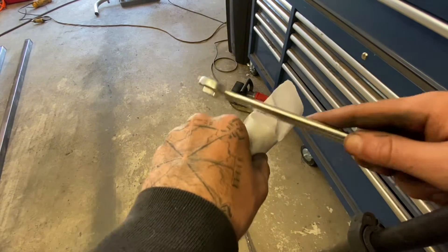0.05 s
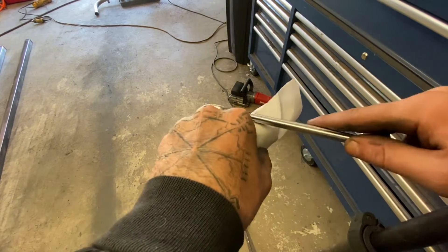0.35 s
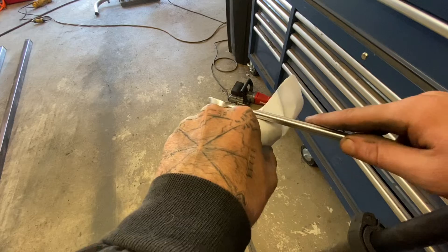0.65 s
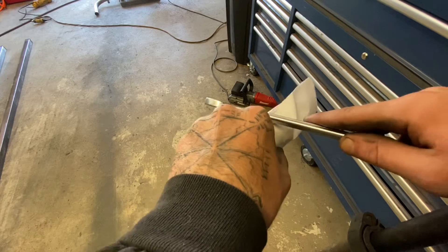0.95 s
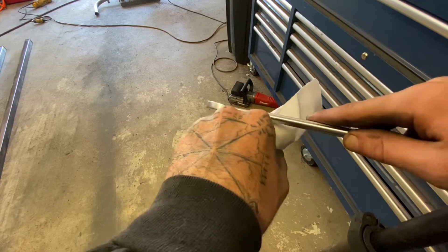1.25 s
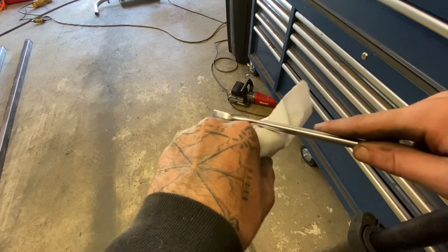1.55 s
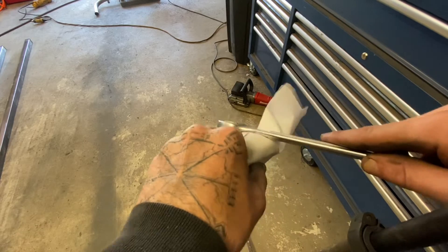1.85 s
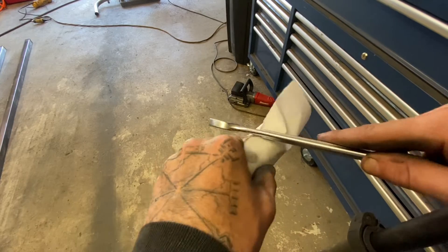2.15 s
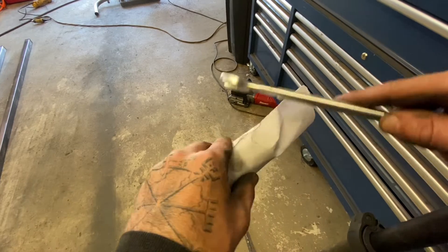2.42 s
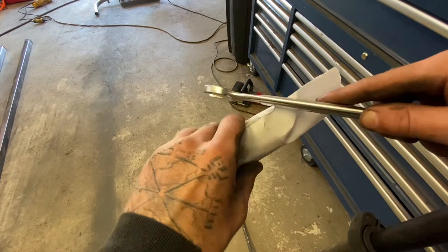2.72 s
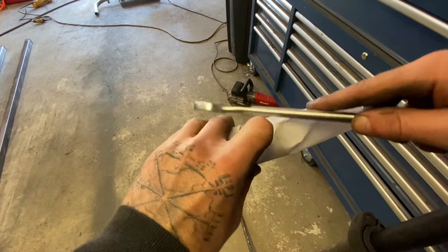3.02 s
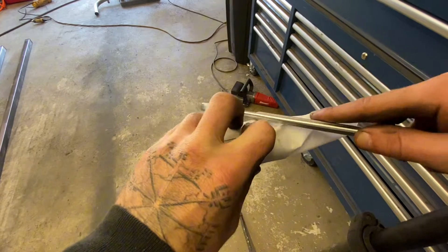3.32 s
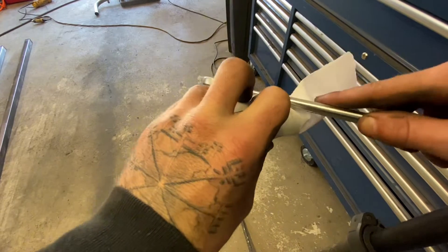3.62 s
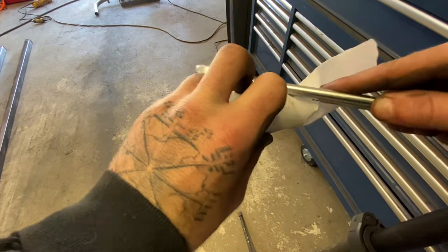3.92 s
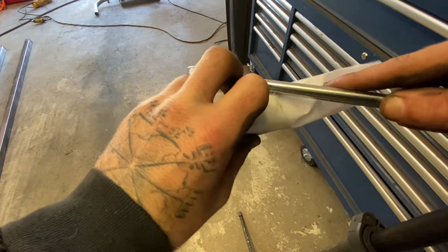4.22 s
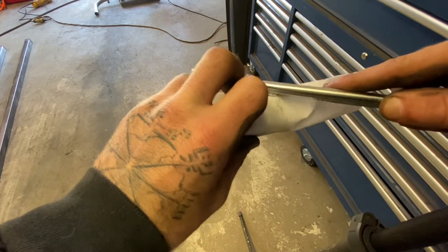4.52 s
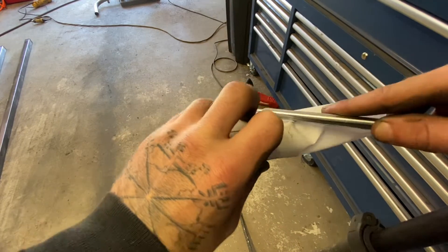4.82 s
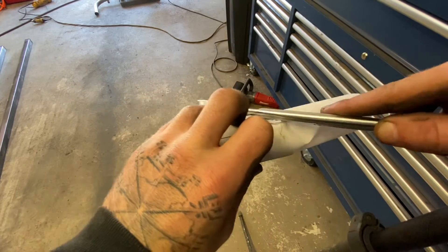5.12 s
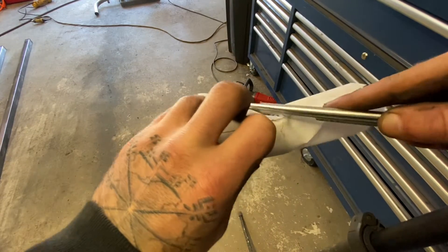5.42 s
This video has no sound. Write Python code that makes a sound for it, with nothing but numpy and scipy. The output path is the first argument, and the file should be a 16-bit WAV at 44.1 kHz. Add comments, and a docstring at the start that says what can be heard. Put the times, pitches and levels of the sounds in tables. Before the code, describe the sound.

A steel wrench is rubbed hard over paper wrapped around a hand-held metal tube, heard up close. It starts faintly, and from about 0.5 seconds quick, uneven strokes make a dry, buzzing rasp, with a fine papery hiss above and a dull rumble from the tube below. Creases pop and the wrench gives short knocks, the strongest at about 2.3 seconds. From 2.5 to 3.2 seconds it is almost quiet, with one small scuff as the hand changes grip. The rubbing then resumes with a slightly different tone and a few lighter knocks. Loud crease pops come at about 3.5, 3.7 and 4.3 seconds, while the strokes run closely together. From around 4.9 seconds they become lighter and thinner, easing off by 5.6 seconds. Behind it all is the very faint, low air noise of a quiet workshop with little echo.

```python
"""First comes a dry, buzzing rasp: a steel wrench is rubbed hard, stroke after stroke, over paper
wrapped round a metal tube. The wrench sticks and slips, so the paper buzzes, its fibres rasp and hiss,
and the hand-held tube rumbles dully. Creases pop, and the wrench knocks on the tube.
Half way through, the hand takes a new grip and the tone changes. Behind it all is a quiet workshop."""
import sys
import numpy as np
from scipy import signal
from scipy.fft import rfft, irfft
from scipy.io import wavfile
from scipy.ndimage import uniform_filter1d

SR = 44100
rng = np.random.default_rng(int(sys.argv[2]) if len(sys.argv) > 2 else 0)


def wav_out(sig):
    """Save sig, one row per channel (or a flat mono array), as 16-bit PCM at SR to the path in sys.argv[1]."""
    wavfile.write(sys.argv[1], SR, np.round(np.clip(np.atleast_2d(sig).T, -1, 1) * 32767).astype(np.int16))


N = 250047
TIME = np.arange(N) / SR
REGRIP_S = 2.9   # when the hand takes its new grip


def from_db(db):
    """Turn decibels into a number to multiply by."""
    return 10 ** (np.asarray(db) / 20)


def rms_one(x):
    """Scale a sound so that its average level (rms) is 1."""
    return x / np.sqrt(np.mean(x ** 2) + 1e-20)


def evened(x):
    """Hold the level at 1 over about 30 ms; the finer grain stays."""
    return x / np.sqrt(np.abs(uniform_filter1d(x ** 2, size=1300)) + 1e-12)


def band(x, low_hz, high_hz):
    """Keep what lies between two frequencies."""
    return signal.sosfilt(signal.butter(2, [low_hz, high_hz], "band", fs=SR, output="sos"), x + 1e-18)


def coloured(x, colour, size=4096):
    """Filter a sound with a tone colour: a table of frequencies and their levels."""
    hz, db = np.transpose(colour)
    grid = np.maximum(np.arange(size // 2 + 1) * SR / size, 1)
    octaves_outside = np.abs(np.log2(grid / np.clip(grid, hz[0], hz[-1])))
    level = np.interp(np.log(grid), np.log(hz), db) - 24 * octaves_outside.clip(0, 2)
    # build a pulse of that colour which starts at once (minimum phase)
    cepstrum = irfft(np.log(from_db(level)))
    cepstrum[1:size // 2] *= 2
    cepstrum[size // 2 + 1:] = 0
    pulse = irfft(np.exp(rfft(cepstrum)))
    return signal.oaconvolve(x, pulse / np.abs(pulse).max())[:len(x)]


def resonance(x, hz, width_hz):
    """Ring at one pitch; a narrower width rings longer."""
    r = np.exp(-np.pi * width_hz / SR)
    feedback = [1, -2 * r * np.cos(2 * np.pi * hz / SR), r * r]
    return signal.lfilter(np.array([1, 0, -1]) * (1 - r * r) / 2, feedback, x + 1e-18)


def drift(per_s):
    """Wander at random, typically by 1 either way."""
    knots = rng.standard_normal(N // 20)
    return rms_one(np.interp(TIME * per_s, np.arange(len(knots)), knots))


def swell(t, rise_s, order):
    """Rise smoothly to 1 at rise_s and die away; a higher order is shorter."""
    return (t / rise_s * np.exp(1 - t / rise_s)) ** order


def add(out, start_s, sound):
    """Mix a short sound in at its start time."""
    at = int(round(start_s * SR))
    out[at:at + len(sound)] += sound[:N - at]


def lift_band(x, start_s, end_s, hz, width_hz, db, fade_s):
    """Lift one band between two times; negative dB cuts it."""
    held = np.clip(np.minimum(TIME - start_s, end_s - TIME) / fade_s + .5, 0, 1)
    return x + (from_db(db) - 1) * held * resonance(x, hz, width_hz)


def clicks(per_s, spread_db, max_spreads):
    """Clicks of uneven size at random moments."""
    sizes = from_db(spread_db * np.minimum(rng.exponential(1, N), max_spreads))
    return sizes * rng.choice([-1, 1], N) * (rng.random(N) < per_s / SR)


# The tone colour of the workshop air. Each row: frequency in Hz, level in dB.
AIR_COLOUR = [(20, -1), (50, 7.5), (64, -1), (78, -0.5), (125, -13), (180, -12), (235, -3), (320, -16),
              (700, -15.5), (1500, -28.5), (3000, -35.5), (14000, -34)]


def workshop_air():
    """The room's own faint, low, steady noise."""
    return from_db(-71) * rms_one(coloured(rng.standard_normal(N), AIR_COLOUR))


def workshop_echo(x, decay_s, gap_s):
    """Sound bounces off floor and tool chest and comes back a little duller."""
    t = TIME[:SR // 2]
    build_up = 1 - np.exp(-(t / gap_s) ** 2)
    tail = rng.standard_normal(len(t)) * from_db(-60 * t / decay_s) * build_up
    tail /= np.sqrt(np.sum(tail ** 2))
    return band(signal.oaconvolve(x, tail)[:N], 180, 9000)


def squeak(peak_s, swell_s, hz, db):
    """A very faint, thin note swells and fades as the wrench comes down."""
    tone = resonance(rng.standard_normal(N), hz, width_hz=70)
    tone = resonance(tone, hz, width_hz=70)
    return from_db(db) * np.exp(-((TIME - peak_s) / swell_s) ** 2) * evened(tone)


# The hand bumps the tube. Each row: start in seconds, peak level in dB, pitch in Hz.
HAND_BUMPS = [(0.576, -61, 190), (0.989, -53, 193), (2.086, -43.5, 192), (2.276, -43, 194),
              (3.23, -52, 150), (4.074, -55.5, 131), (5.283, -51.5, 234)]


def hand_bumps():
    """Flesh against the tube gives a few soft, low vibrations."""
    out, t = np.zeros(N), TIME[:SR // 6]
    for start_s, db, hz in HAND_BUMPS:
        add(out, start_s, from_db(db) * swell(t, rise_s=0.0049, order=1) * np.sin(2 * np.pi * hz * t))
    return out


# The tone colour of cracking paper, also in pops and knocks. Each row: frequency in Hz, level in dB.
CRACK_COLOUR = [(700, -30), (1400, -5.5), (2050, -1.5), (2600, -3.5), (3100, -1.5), (3600, -4), (4300, -11),
                (5200, -15.5), (6600, -7.5), (7900, -22.5), (9200, -8.5), (10500, -32), (15000, -37.5)]


def crinkles():
    """The paper crackles with lone, tiny cracks."""
    return rms_one(coloured(clicks(per_s=40, spread_db=6.5, max_spreads=3), CRACK_COLOUR))


# Creases that pop. Each row: start in seconds, peak level in dB, pitch in Hz,
# snap in dB compared with that peak (before snap_trim_db is added), swell time in seconds.
CREASE_POPS = [(0.212, -43, 1166, -21.5, 0.0022), (0.468, -24, 1580, -2.5, 0.0011),
               (0.534, -22, 1200, 0, 0.0018), (0.6082, -24.5, 1030, -3, 0.0022),
               (0.6691, -21.5, 1340, -22, 0.00094), (0.693, -27, 1320, -20, 0.0013),
               (0.8081, -21.5, 1400, -1.5, 0.001), (1.1621, -21.5, 1130, -21, 0.0015),
               (1.166, -21, 1210, -2.5, 0.0018), (1.268, -23.5, 1180, -26, 0.001),
               (1.4352, -21.5, 1345, -20, 0.0039), (1.4412, -18.5, 1120, -6, .0013),
               (1.4515, -16.5, 1250, -11, 0.0014), (1.6612, -22, 1140, -8, 0.0012),
               (1.8229, -22, 1213, 2, 0.0014), (2.2649, -16.5, 1227, -13, 0.0011),
               (2.3884, -27.5, 1154, -8, 0.0011), (2.549, -57.5, 1377, 0.5, 0.00087),
               (2.7227, -58, 1260, -11, .0021), (2.937, -36, 1236, -10, 0.0019),
               (2.9483, -39, 1230, -15, .001), (3.448, -25, 1150, -18, .0008),
               (3.4671, -16.5, 1160, -4, 0.001), (3.4727, -12, 1135, -9.5, 0.0018),
               (3.6893, -10.5, 1267, -8, 0.0017), (3.7053, -21.5, 1415, -3, 0.001),
               (4.0297, -17.5, 1244, -2, .0019), (4.3395, -11.5, 1251, -9, 0.0027),
               (4.3474, -23.5, 1320, -10, 0.0022), (4.3776, -26.5, 1220, -5, 0.0024),
               (4.7643, -29.5, 1080, 1, 0.0009), (5.5911, -32.5, 1204, -24, 0.0042)]


def crease_pops(snap_decay_s, snap_trim_db):
    """A crease flips over: a small dull snap, then a few vibrations that swell and die."""
    out, t = np.zeros(N), TIME[:SR // 20]
    for start_s, db, hz, snap_db, rise_s in CREASE_POPS:
        burst = rng.standard_normal(len(t)) * from_db(-60 * t / snap_decay_s)
        snap = band(coloured(burst, CRACK_COLOUR), 900, 5500)
        snap *= from_db(snap_db + snap_trim_db) / np.abs(snap).max()
        flip = swell(t, rise_s, order=3) * np.sin(2 * np.pi * hz * t)
        add(out, start_s, from_db(db) * (flip + snap))
    return out


# The wrench knocks on the wrapped tube. Each row: start in seconds, tube thud in dB,
# paper slap in dB, crack in dB, pitch of the ring in Hz.
WRENCH_KNOCKS = [(0.48, -62, -11.5, -9.5, 3320), (0.5533, -36, -16, -15.5, 6470),
                 (0.8497, -44, -18.5, -16.5, 4100), (0.9118, -48, -18.5, -16, 3120),
                 (1.4455, -32.5, -14.5, -20, 3000), (1.681, -28, -17, -15.5, 2830),
                 (1.9475, -25, -21.5, -14.5, 3520), (2.0506, -33.5, -15.5, -22.5, 3800),
                 (2.284, -22, -7, -11, 4060), (3.2336, -49, -27.5, -20.5, 3380),
                 (3.406, -56, -27, -20, 2760), (3.4732, -43.5, -26, -27, 3300)]


def wrench_knocks(chatter_decay_s, crush_decay_s):
    """A hard hit chatters and crushes the paper, shaking tube, sleeve and fibres together."""
    out, t = np.zeros(N), TIME[:SR // 8]
    for start_s, thud_db, slap_db, crack_db, ring_hz in WRENCH_KNOCKS:
        chatter = from_db(-12.5 - 60 * t / chatter_decay_s)
        crush = from_db(-24 - 60 * t / crush_decay_s)
        force = rng.standard_normal(len(t)) * (chatter + crush)
        force[0] = 1   # the hit itself
        thud = coloured(force, TUBE_COLOUR)
        slap = band(force, 1100, 1944)
        crack = coloured(force, CRACK_COLOUR)
        # each struck spot has a short ring of its own
        crack += from_db(8.5) * resonance(crack, ring_hz, width_hz=700)
        for db, sound in (thud_db, thud), (slap_db, slap), (crack_db, crack):
            add(out, start_s, -from_db(db) * sound / np.abs(sound).max())
    return out


def flexing(x, low_hz, high_hz, count, width_ratio, depth):
    """Small patches of paper tighten and slacken, so their resonances come and go."""
    pitches = np.geomspace(low_hz, high_hz, count)
    return x + sum(depth * drift(per_s=20) * resonance(x, hz, width_ratio * hz) for hz in pitches)


# The tone colour of the hiss. Each row: frequency in Hz, level in dB.
HISS_COLOUR = [(4000, -35.5), (7000, 5.5), (8000, -4), (9200, 4), (10200, -3), (12000, -3.5), (14000, -4),
               (15500, -11)]


def fibre_hiss(force):
    """Fine slips brush a high hiss out of the paper's fibres."""
    hiss = coloured(force, HISS_COLOUR)
    return evened(flexing(hiss, 7000, 18000, count=10, width_ratio=0.044, depth=0.9))


# The tone colour of the hand-held tube. Each row: frequency in Hz, level in dB.
TUBE_COLOUR = [(60, -42), (130, -24), (200, -9), (280, -10), (380, 2), (500, 2.5), (590, 4), (730, -4),
               (860, -0.5), (1100, -16.5), (2000, -53)]
# What the new grip does to the tube. Each row: pitch in Hz, width in Hz, change in dB.
TUBE_GRIP_CHANGES = [(380, 190, -6), (759, 57, 8.5)]


def tube_rumble(force):
    """The slips shake the tube; the new grip damps its low ring and frees a higher one."""
    rumble = coloured(force, TUBE_COLOUR)
    for hz, width_hz, db in TUBE_GRIP_CHANGES:
        rumble = lift_band(rumble, REGRIP_S, np.inf, hz, width_hz, db, fade_s=0.03)
    return evened(flexing(rumble, 170, 850, count=8, width_ratio=0.44, depth=0.41))


# The tone colour of the rasp, one table for each grip. Each row: frequency in Hz, level in dB.
FIRST_GRIP_COLOUR = [(900, -16.5), (1500, -2), (1800, 3), (2050, 7), (2500, -3.5), (3100, 1.5),
                     (3600, -4.5), (4300, -6.5), (5100, -9), (5900, -6.5), (6750, -10.5), (7900, -21.5),
                     (9100, -21), (10500, -41.5)]
SECOND_GRIP_COLOUR = [(900, -16), (1500, -4), (1900, -1), (2400, 7), (2750, 0), (3400, 1), (4200, -2.5),
                      (5100, -2.5), (5900, -4.5), (6750, -6), (7900, -23.5), (9200, -15.5), (10500, -43.5)]
# Patches of paper pinned under the wrench, which ring or are damped.
# Each row: start in seconds, end in seconds, pitch in Hz, change in dB.
PINNED_PATCHES = [(0.46, 0.522, 2200, 2), (1.038, 1.126, 2340, 7), (1.35, 2.477, 4100, 8),
                  (1.76, 2.266, 6000, 3.5), (2.277, 2.416, 6900, 11.5), (3.203, 3.375, 3430, 10),
                  (3.29, 3.396, 2500, -18), (3.612, 3.85, 2870, 9), (3.897, 4.87, 2240, 2),
                  (4.42, 4.68, 4870, 5), (4.874, 5.314, 4040, 8.5), (5.51, 5.7, 3230, 8.5)]


def fibre_rasp(force):
    """The slips scrape the fibres; each grip holds the paper in its own way and colours the rasp."""
    rasp = np.where(TIME < REGRIP_S,
                    coloured(force, FIRST_GRIP_COLOUR), coloured(force, SECOND_GRIP_COLOUR))
    for start_s, end_s, hz, db in PINNED_PATCHES:
        rasp = lift_band(rasp, start_s, end_s, hz, width_hz=480, db=db, fade_s=0.032)
    # the last, lighter strokes lose the middle of the rasp
    rasp = lift_band(rasp, start_s=4.86, end_s=np.inf, hz=2350, width_hz=1070, db=-10, fade_s=0.032)
    return evened(flexing(rasp, 1600, 9000, count=22, width_ratio=0.021, depth=1.0))


# The resonances of the paper sleeve. Each row: pitch in Hz, width in Hz, level in dB.
SLEEVE_RESONANCES = [(1001, 145, -1.5), (1168, 111, 4), (1356, 80, 3.5), (1724, 200, -7.5)]


def paper_buzz(force, wander_db):
    """Coarse slips make the sleeve ring briefly at a few pitches, whose shares shift as it bends."""
    buzz = np.zeros(N)
    for k, (hz, width_hz, db) in enumerate(SLEEVE_RESONANCES):
        share = from_db(db + wander_db * drift(per_s=22))
        buzz += (-1) ** k * share * resonance(force, hz, width_hz)
    return evened(band(buzz, 745, 1600))


def slips(per_s, spread_db, friction_db):
    """The wrench sticks and slips in tiny jerks over a bed of smooth friction."""
    jerks = rms_one(clicks(per_s, spread_db, max_spreads=4))
    return jerks + from_db(friction_db) * rng.standard_normal(N)


# The rubbing strokes. Each row: moment of full pressure in seconds, hold in seconds,
# seconds taken to rise 30 dB, then the levels in dB of buzz, rasp, hiss and rumble (before trim_db).
WRENCH_STROKES = [(0.21, 0.009, 0.0087, -51.5, -63, -81, -69),
                  (0.283, 0.0061, 0.027, -41, -56.5, -69, -50.5), (0.48, .012, 0.013, -38, -24, -48, -43.5),
                  (0.559, 0.011, 0.092, -33, -34, -53, -42), (0.62, 0.065, .064, -35.5, -42.5, -60, -53.5),
                  (0.824, 0.013, .059, -32.5, -35.5, -49.5, -46.5),
                  (0.898, 0.074, 0.022, -41.5, -40, -48.5, -50),
                  (1.156, 0.031, 0.06, -35, -40.5, -55.5, -54), (1.235, 0.057, 0.037, -39.5, -44, -53, -56),
                  (1.441, 0.0071, .048, -32, -36.5, -49.5, -41),
                  (1.503, 0.068, .049, -35.5, -44, -55.5, -60), (1.675, .004, 0.052, -27, -34, -47, -42.5),
                  (1.844, 0.01, 0.58, -39.5, -48, -83, -60.5),
                  (1.951, 0.003, 0.073, -29, -32.5, -50.5, -49.5),
                  (2.034, 0.067, 0.14, -38, -43, -56.5, -47.5), (2.287, 0.002, 0.063, -29, -32.5, -45, -39),
                  (2.331, 0.085, 0.037, -44, -49, -76.5, -62), (2.798, 0.031, 0.051, -71, -97, -99.5, -96),
                  (2.943, .005, 0.034, -46.5, -64.5, -82, -57), (3.131, .008, .025, -74, -80, -89, -77),
                  (3.232, 0.014, 0.022, -35, -49, -58.5, -53), (3.38, 0.066, 0.035, -37.5, -43, -57.5, -60),
                  (3.468, 0.088, 0.027, -43, -44.5, -58, -60.5),
                  (3.664, 0.038, 0.074, -38, -41, -53, -61.5), (3.736, 0.086, 0.087, -43, -48.5, -71, -67),
                  (3.96, 0.03, 0.036, -36, -45, -80, -59.5), (4.028, 0.059, .056, -40.5, -42, -54.5, -53.5),
                  (4.144, 0.062, 0.068, -36, -40.5, -53.5, -51.5),
                  (4.3, 0.016, 0.2, -35, -40.5, -54, -54.5),
                  (4.429, 0.017, 0.1, -38.5, -39.5, -49.5, -46.5),
                  (4.546, 0.018, 0.19, -38.5, -42.5, -54.5, -56),
                  (4.635, 0.054, .05, -38.5, -40.5, -52.5, -53.5), (4.749, 0.046, 0.22, -37, -45, -56, -56),
                  (4.864, .03, 0.038, -39, -42, -58, -51), (4.971, 0.033, 0.05, -40.5, -48, -63, -56),
                  (5.1, 0.02, 0.039, -42.5, -47.5, -61.5, -50),
                  (5.208, 0.027, 0.061, -45.5, -55, -68, -61.5), (5.303, 0.048, .026, -42, -45, -55, -53),
                  (5.385, 0.059, 0.17, -48.5, -56, -73, -63.5), (5.541, .065, 0.051, -52.5, -53, -68, -60),
                  (5.628, 0.047, .04, -52, -55.5, -67.5, -66.5)]
LAYERS = ("buzz", "rasp", "hiss", "rumble")


def stroke_level(layer, trim_db, arch_db_per_s, fade_db_per_s):
    """One layer's level as the wrench presses down, holds and lets go, stroke after stroke."""
    t, power = TIME[::40], 0
    for full_s, hold_s, rise_s, *levels_db in WRENCH_STROKES:
        briskness = 1.69 if full_s > REGRIP_S else 1   # the new grip lets go faster
        rise_db = -30 * np.maximum(full_s - t, 0) / rise_s
        release = np.maximum(t - full_s - hold_s, 0) * briskness
        # the wrench is fastest in mid-stroke, so the level arches over the hold
        arch = np.sin(np.pi * np.clip((t - full_s) / hold_s, 0, 1)) - .5
        held = from_db(levels_db[LAYERS.index(layer)] + arch_db_per_s * hold_s * arch + rise_db)
        rub = held * from_db(-fade_db_per_s * release)
        settling = held * from_db(-21.5 - 115 * release)   # the eased paper rustles on faintly
        power += rub ** 2 + settling ** 2
    return from_db(trim_db) * np.interp(TIME, t, np.sqrt(power))


def rubbing():
    """Coarse and fine slips drive paper and tube, in bunches as the wrench catches."""
    catching = drift(per_s=220)
    coarse = slips(per_s=700, spread_db=-0.5, friction_db=-10) * from_db(1.1 * catching)
    fine = slips(per_s=5000, spread_db=1.0, friction_db=-4.5) * from_db(0.7 * catching)
    rasp = fibre_rasp(fine + from_db(-10.5) * coarse)
    hiss = fibre_hiss(fine)
    rumble = tube_rumble(coarse + fine)
    buzz = paper_buzz(coarse, wander_db=4.5)
    rasp += from_db(-16.5) * crinkles()
    return (buzz * stroke_level("buzz", trim_db=-0.3, arch_db_per_s=12, fade_db_per_s=474)
            + rasp * stroke_level("rasp", trim_db=-0.28, arch_db_per_s=28, fade_db_per_s=310)
            + hiss * stroke_level("hiss", trim_db=1.56, arch_db_per_s=77, fade_db_per_s=260)
            + rumble * stroke_level("rumble", trim_db=-0.86, arch_db_per_s=62, fade_db_per_s=224))


def scene():
    """Close rubbing, pops and knocks in a quiet workshop; each decay time is for a fall of 60 dB."""
    rub = rubbing() + squeak(peak_s=0.17, swell_s=0.04, hz=3700, db=-85) + hand_bumps()
    pops = crease_pops(snap_decay_s=0.015, snap_trim_db=-4)
    hits = pops + wrench_knocks(chatter_decay_s=0.0061, crush_decay_s=0.088)
    echo = workshop_echo(from_db(-13) * rub + from_db(-9.5) * hits, decay_s=0.2, gap_s=0.0035)
    return (rub + hits + echo + workshop_air())[None]


def record(dry):
    """Cut the highest treble steeply, above 15700 Hz."""
    return signal.sosfilt(signal.ellip(12, .1, 80, 15700, fs=SR, output="sos"), dry)


dry = scene()
out = record(dry)
wav_out(out)
```